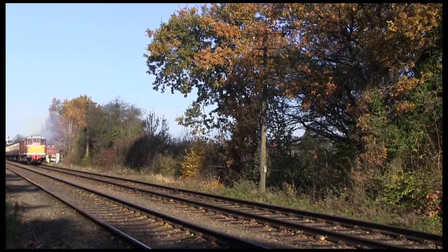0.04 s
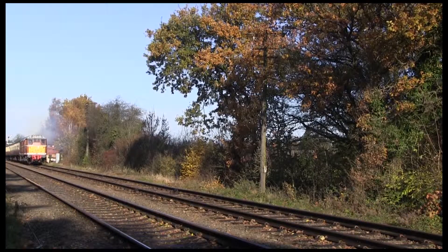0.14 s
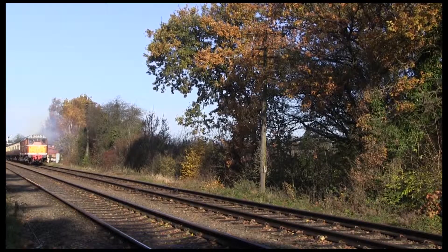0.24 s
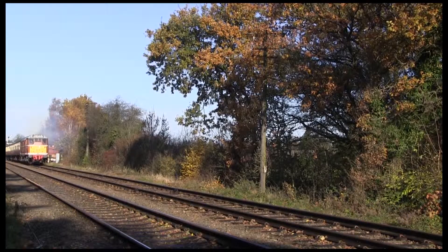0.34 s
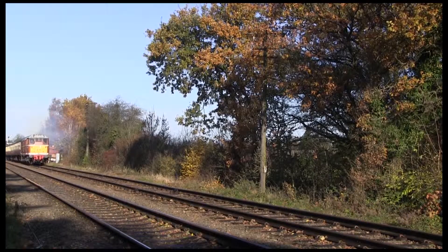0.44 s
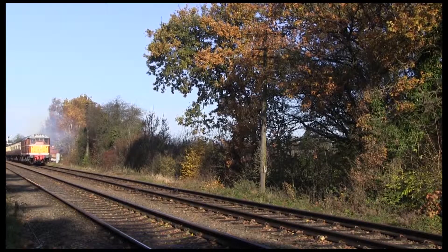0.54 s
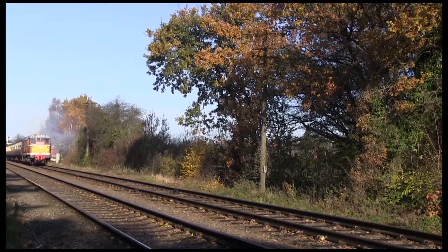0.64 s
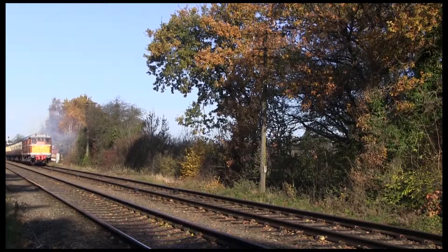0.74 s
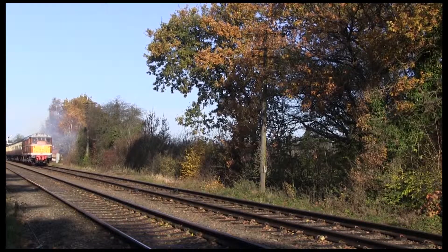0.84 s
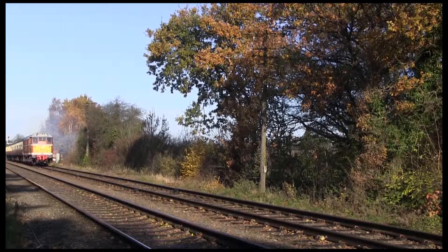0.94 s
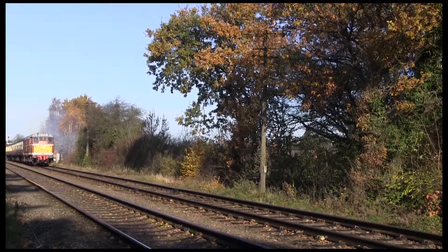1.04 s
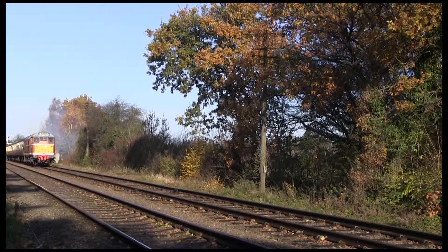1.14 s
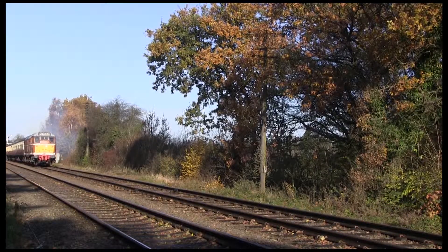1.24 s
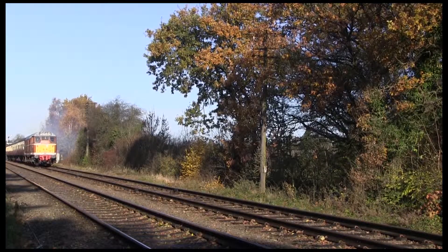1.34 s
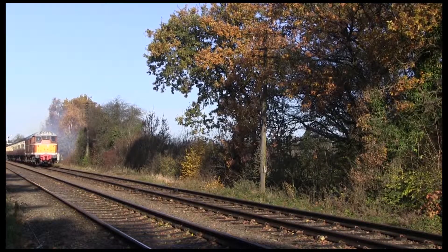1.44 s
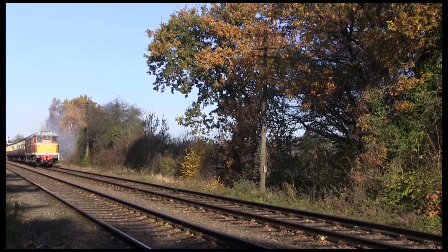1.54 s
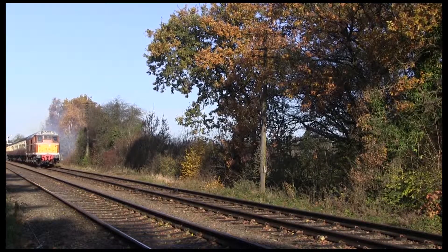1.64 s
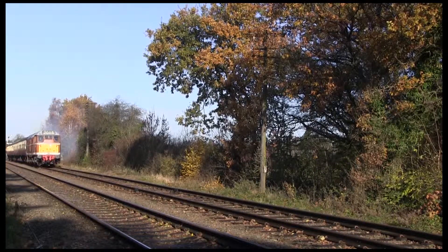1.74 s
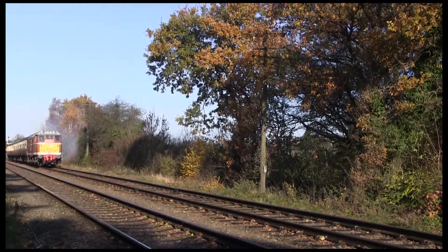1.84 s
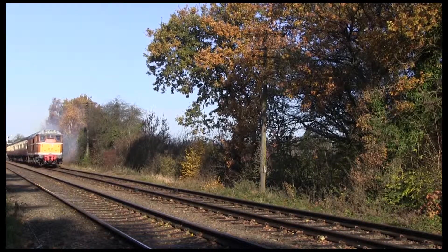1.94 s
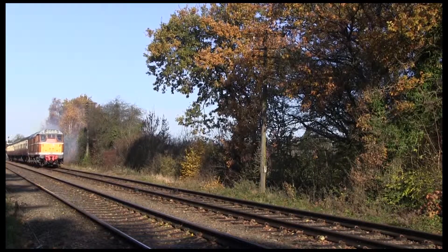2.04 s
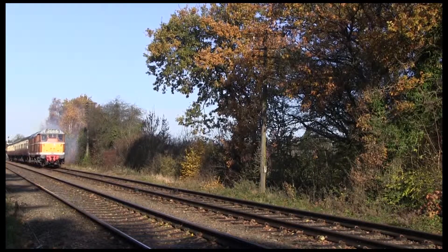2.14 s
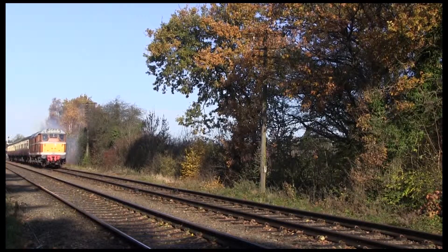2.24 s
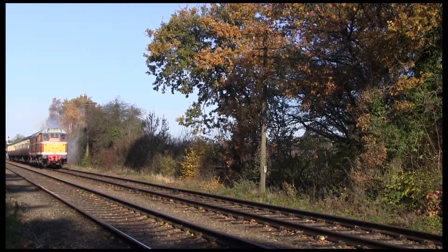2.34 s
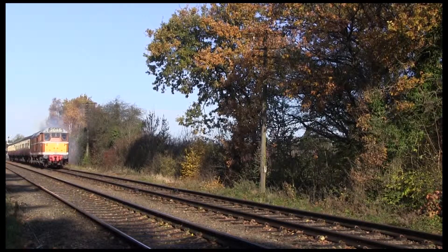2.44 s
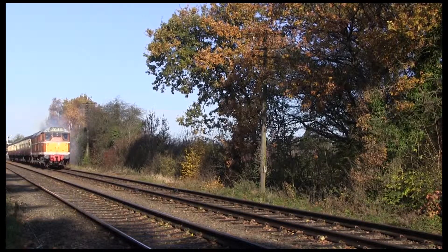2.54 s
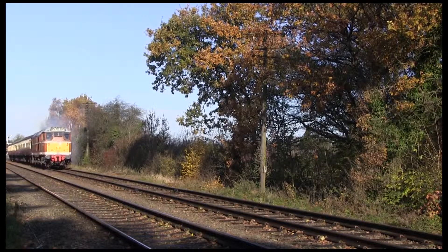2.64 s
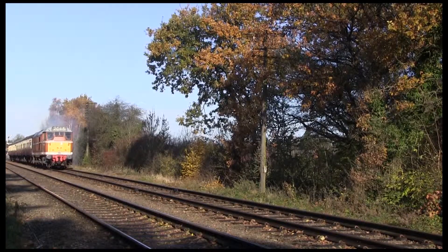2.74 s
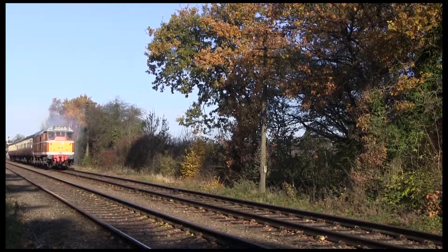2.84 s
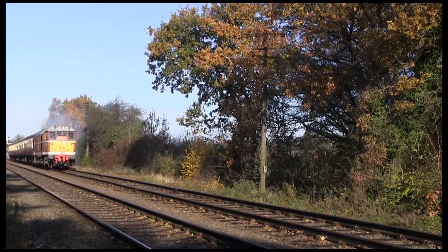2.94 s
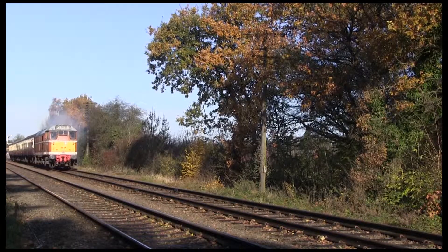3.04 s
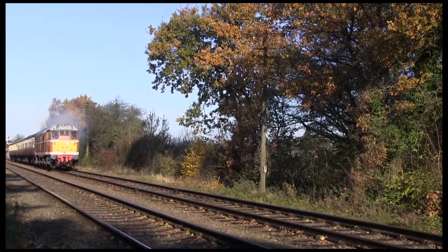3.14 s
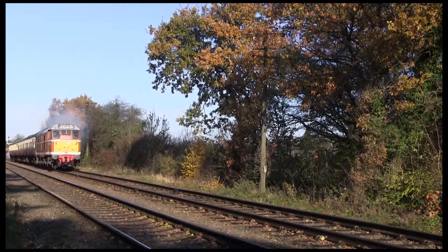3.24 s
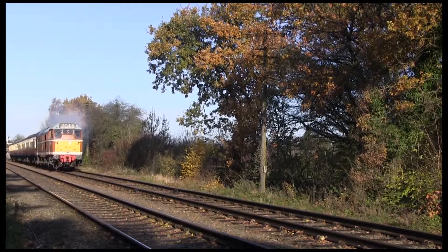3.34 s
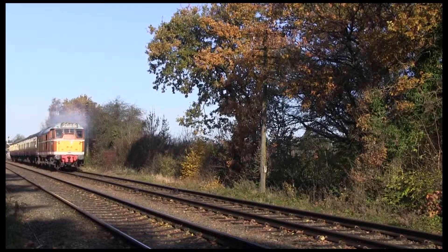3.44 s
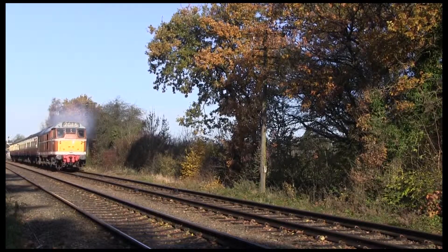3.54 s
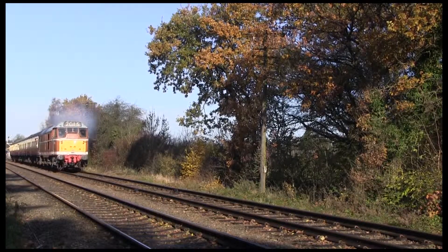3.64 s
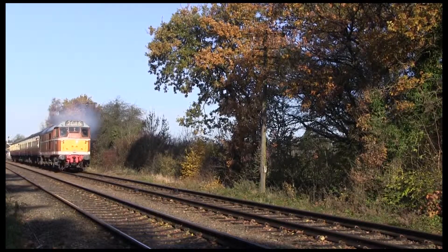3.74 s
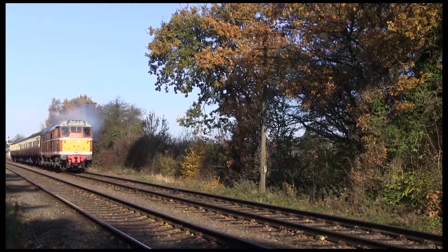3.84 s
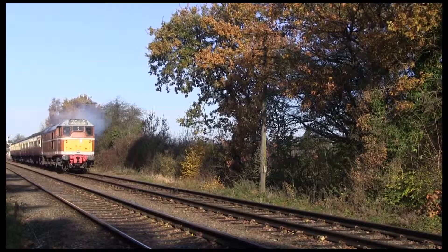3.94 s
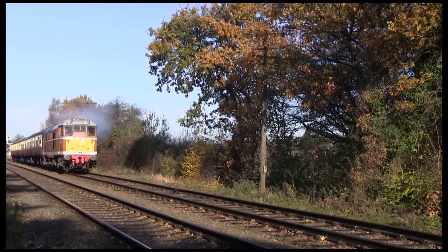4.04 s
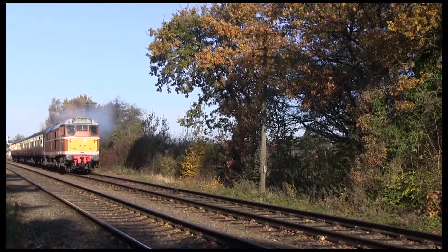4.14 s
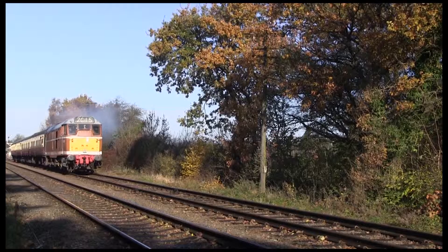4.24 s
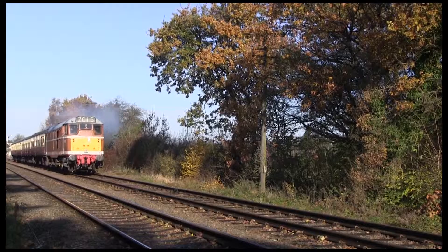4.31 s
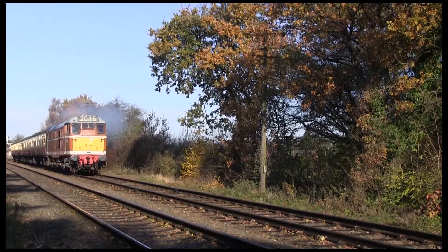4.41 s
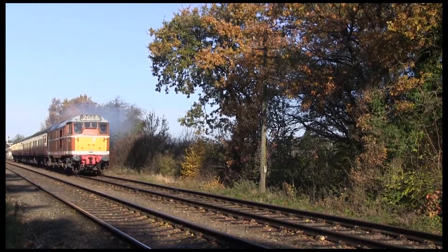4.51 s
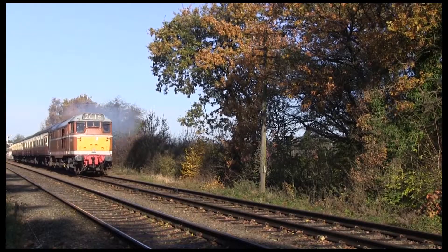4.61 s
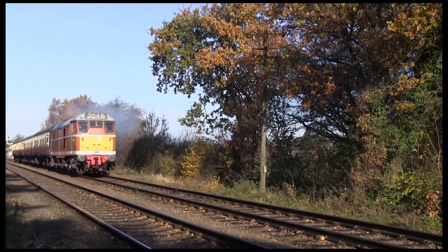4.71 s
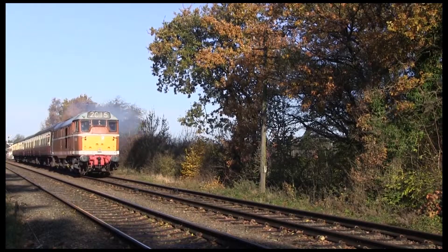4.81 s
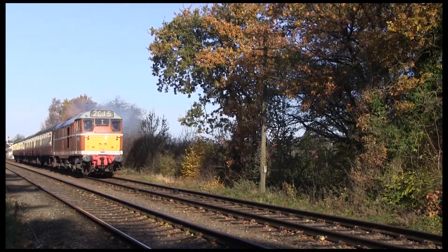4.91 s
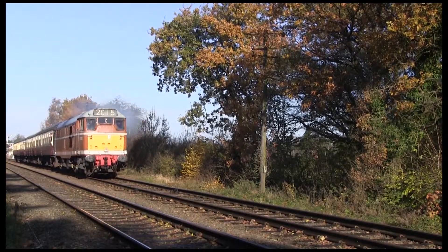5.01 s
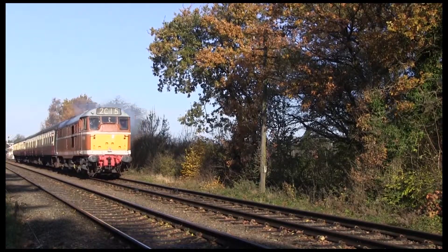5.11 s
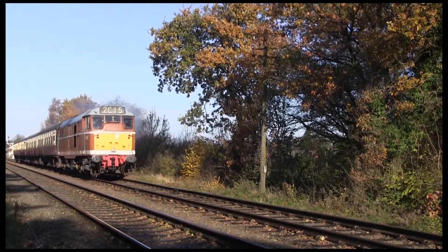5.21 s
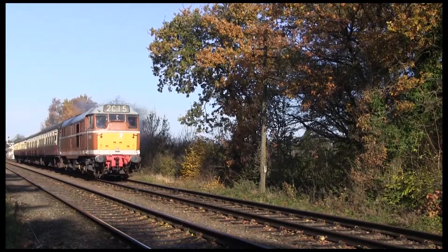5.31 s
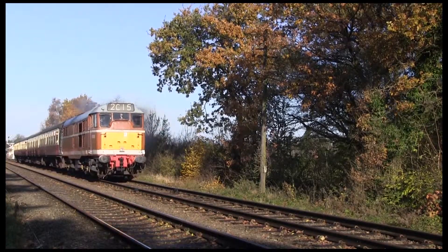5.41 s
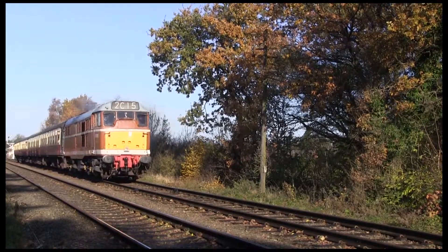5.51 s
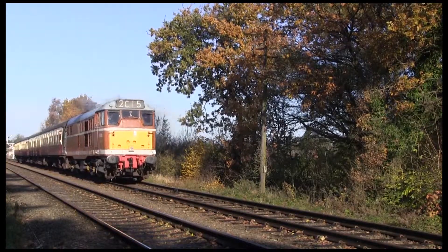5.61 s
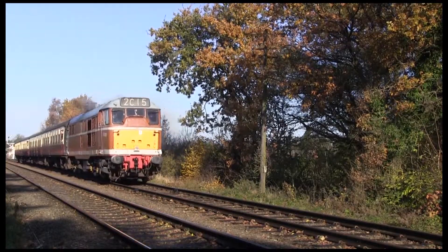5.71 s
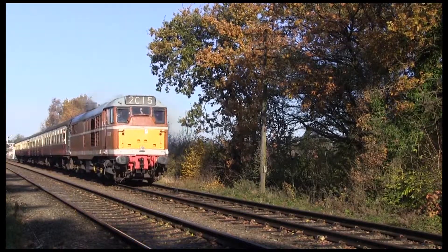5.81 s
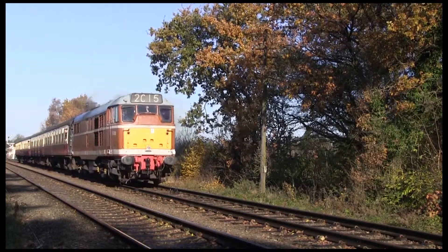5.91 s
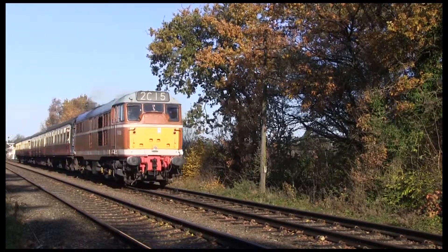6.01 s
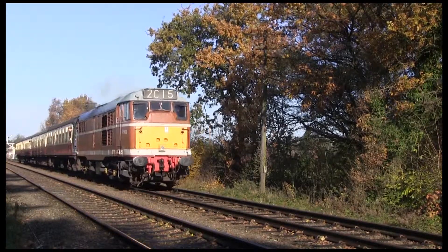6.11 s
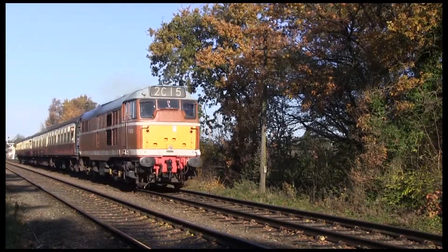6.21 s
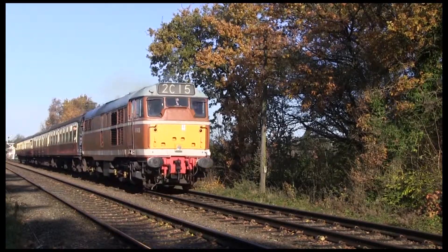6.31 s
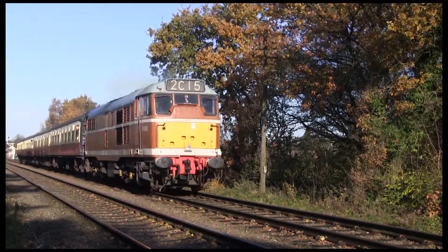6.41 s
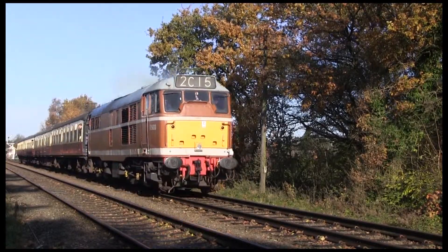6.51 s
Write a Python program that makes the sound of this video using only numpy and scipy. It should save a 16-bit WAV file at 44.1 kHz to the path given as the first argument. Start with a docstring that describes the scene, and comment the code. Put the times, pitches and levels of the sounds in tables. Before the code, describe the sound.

Outdoors beside a railway, a diesel locomotive draws steadily nearer. A deep, uneven engine throb and boom holds nearly constant pitch while rough exhaust growl, roar and hiss pulse rapidly above it. The gas noise surges midway with sharp spits, eases slightly, then becomes loud and harsh. Wheels rumble beneath. One fixed lineside microphone, sound in the right channel only, left nearly silent.

```python
"""Diesel locomotive closing in, from the lineside

A twelve-cylinder diesel under power draws a train towards a single microphone beside the track.
Uneven firings throb through the exhaust pipe and steep fronts knock on the stack; six gas blasts an engine
cycle shape noise into growl, roar, rasp and hiss, with gliding hollow colours, whistles and sharp spits.
Most layers grow by their own law with nearness; the gas surges midway over a rumble of wheels.
All levels stand ahead of the microphone's gain; the left channel holds only crosstalk and hiss."""
import sys
import numpy as np
from scipy import signal
from scipy.fft import rfft, irfft
from scipy.io import wavfile
from scipy.ndimage import uniform_filter1d

SR = 44100
rng = np.random.default_rng(int(sys.argv[2]) if len(sys.argv) > 2 else 0)


def waveform_to_disk(signal):
    """Save audio, clipped to [-1, 1], as 16-bit WAV at the path in sys.argv[1]."""
    frames = np.transpose(np.atleast_2d(signal))
    scaled = np.clip(frames, -1, 1) * 32767
    samples = np.round(scaled).astype(np.int16)
    wavfile.write(sys.argv[1], SR, samples)


N = 289296
TIME = np.arange(N) / SR  # s

# one engine cycle, a row per cylinder: (pulse arrival [firing intervals], pulse level [dB],
# steep front arrival [firing intervals], front level [dB])
CYLINDER_FIRINGS = [(0.05, 7, 0.095, -3), (0.73, -2.5, 0.82, -23), (2.11, 4.5, 2.24, -5.5),
                    (3.86, 3, 3.1, -12), (4.19, 5, 5.2, -4), (5.35, 3, 5.36, -1.5), (6.0, 7.5, 6.08, 0.5),
                    (7.48, 5, 7.56, 0.5), (8.02, 1, 9.9, -3.5), (9.19, 5, 3.9, -32),
                    (10.17, -3.5, 10.15, -11.5), (11.01, 1.5, 11.02, -6)]


def undb(db):
    """Decibels to gain."""
    return 10 ** (np.asarray(db) / 20)


def unit(x):
    """Scale to rms 1."""
    return x / np.sqrt(np.mean(x ** 2))


def even(x, size=512):
    """Hold a noise at rms 1 from moment to moment, so that every blast carries a like charge."""
    return x / np.sqrt(uniform_filter1d(x ** 2, size))


def curves(table):
    """Each column of a table as a line through time."""
    s, *columns = np.transpose(table)
    return [np.interp(TIME, s, column) for column in columns]


def band(x, low_hz, high_hz, order=4):
    """Band-pass without delay."""
    f = np.arange(N // 2 + 1) * SR / N + 1e-3  # never zero
    low_side = 1 + (low_hz / f) ** (2 * order)
    high_side = 1 + (f / high_hz) ** (2 * order)
    return irfft(rfft(x) / low_side / high_side, N)


def colour(x, points, size=16384):
    """Causal minimum-phase filter through (Hz, dB) points, by folding the cepstrum."""
    hz, db = np.transpose(points)
    f = np.arange(size // 2 + 1) * SR / size + 1
    gain = undb(np.interp(np.log(f), np.log(hz), db))
    cepstrum = irfft(np.log(gain))
    cepstrum[1:size // 2] *= 2
    cepstrum[size // 2 + 1:] = 0
    response = irfft(np.exp(rfft(cepstrum)))
    return signal.fftconvolve(x, response)[:N]


def resonance(x, hz, width_hz):
    """One resonance, gain 1 at its centre."""
    return signal.lfilter(*signal.iirpeak(hz, hz / width_hz, fs=SR), x)


def ring(x, notes, gain=1):
    """Add the ringing of a set of resonances to a sound."""
    return x + gain * sum(undb(db) * resonance(x, hz, width_hz) for hz, width_hz, db in notes)


def lift(x, part, db):
    """Raise or lower one part of a sound by a level curve."""
    return x + part * (undb(db) - 1)


def noise():
    """White noise."""
    return rng.standard_normal(N)


def walk(rate):
    """Smooth random wandering with rms 1, given a new target rate times a second."""
    k = int(SR / rate)
    steps = np.repeat(rng.standard_normal(N // k + 1), k)
    return unit(uniform_filter1d(steps, k)[:N])


def narrow(hz, width_hz):
    """A tone smeared by turbulence into noise reaching about width_hz each side of a pitch; rms 1."""
    smear = unit(band(noise(), 0.97, width_hz, order=1))
    return unit(smear * np.sin(2 * np.pi * np.cumsum(hz) / SR))


def cycle_noise(crank, repeat, size=6000):
    """Noise whose power repeats in part with every engine cycle: each cylinder has its own voice."""
    place = (crank / len(CYLINDER_FIRINGS) % 1 * size).astype(int)
    repeating = rng.standard_normal(size)[place]
    return np.sqrt(repeat) * repeating + np.sqrt(1 - repeat) * noise()


def distance():
    """Metres from locomotive to microphone, along a straight track at steady speed."""
    train_m_s, passes_s, track_m = 11.234, 8.98, 8.7  # speed, time of drawing level, microphone to track
    return np.hypot(train_m_s * (passes_s - TIME), track_m)


def approach(near_db, fall_db):
    """A level that is near_db at 30 m and drops by fall_db with each doubling of distance."""
    near_m = 30
    return near_db - fall_db * np.log2(distance() / near_m)


def closeness():
    """0 while the locomotive is far off, nearing 1 once it is close."""
    middle_m, span_m = 41, 3.1
    return 1 / (1 + np.exp((distance() - middle_m) / span_m))


def through_air(x, patchy_db, count=8):
    """Moving air makes each half octave swell and fade on its own."""
    out = x
    far = 1 - 0.4 * TIME / TIME[-1]  # a shorter path wavers less
    for hz in 450 * np.sqrt(2) ** np.arange(count):
        half_octave = band(x, hz, hz * np.sqrt(2), order=8)
        out = lift(out, half_octave, patchy_db * far * walk(6))
    return out


def firings(crank, slot, db, scatter_db):
    """One pressure pulse per cylinder, in the same lopsided pattern every engine cycle."""
    starts = len(slot) * np.arange(-1, crank[-1] / len(slot))
    due = (starts[:, None] + slot).ravel()
    at = np.interp(due, crank, np.arange(N), left=-1, right=-1).astype(int)
    size = undb(np.tile(db, len(starts)) + scatter_db * rng.standard_normal(len(at)))
    return np.bincount(at[at >= 0], size[at >= 0], N)


def exhaust(crank):
    """Firings ring the pipe: thud, boom and drone carry far and grow slowly; throb and overtone are thinner."""
    # exhaust pipe response: (frequency [Hz], gain [dB]); each band is levelled afresh below
    pipe_response = [(28.0, -49.0), (38.0, -68.8), (46.0, -18.4), (58.0, -29.6), (70.0, 0.0), (92.0, -9.6),
                     (125.0, -14.2), (150.0, -20.3), (180.0, -29.9), (210.0, -20)]
    # the thin overtone as it reaches the microphone: (time [s], level [dB])
    overtone_level = [(0, -58), (1.5, -55), (3, -52), (4, -44.5), (5.2, -41), (6.56, -36.5)]
    slot, db, _, _ = np.transpose(CYLINDER_FIRINGS)
    pipe = -colour(firings(crank, slot, db, scatter_db=0.5), pipe_response)
    boom_loss_db = 4.5 * closeness()  # close up the boom stops growing
    thud_db = approach(near_db=-32.0, fall_db=7.5)
    boom_db = approach(near_db=-29.5, fall_db=6.0) - boom_loss_db
    drone_db = approach(near_db=-30.5, fall_db=6.5) - 0.7 * boom_loss_db
    throb_db = approach(near_db=-42.5, fall_db=13.5)
    overtone_db = curves(overtone_level)[0] + walk(5)
    thud = unit(band(pipe, 27, 76.5, order=10)) * undb(thud_db)
    boom = unit(band(pipe, 78.4, 106.7, order=10)) * undb(boom_db)
    drone = unit(band(pipe, 103.6, 154, order=8)) * undb(drone_db)
    throb = unit(band(pipe, 158, 174, order=12)) * undb(throb_db)
    overtone = unit(band(pipe, 209, 213.8, order=20)) * undb(overtone_db)
    return thud + boom + drone + throb + overtone


def bark(crank):
    """Steep pressure fronts knock on the stack, and the casing rattles almost alike every cycle."""
    # notes of the casing that the knocks excite: (frequency [Hz], width [Hz], gain [dB])
    casing_notes = [(207, 17, -4.5), (259.4, 6.6, -7.5)]
    _, _, slot, db = np.transpose(CYLINDER_FIRINGS)
    knock = -resonance(firings(crank, slot, db, scatter_db=0.5), hz=243, width_hz=146)
    knock = band(band(knock, 1, 230, order=1), 206, 1500)
    knock = unit(ring(knock, casing_notes))
    rattle = unit(band(cycle_noise(crank, repeat=0.89), 224, 376)) * undb(-7.5)
    return (knock + rattle) * undb(approach(near_db=-32.5, fall_db=15.5))


def blasts(crank, depth_db, start, scatter_db, pattern=None):
    """Gas flow that jumps and dies away once for every two firings; rms held near 1."""
    # extra strength of the six blasts of an engine cycle, in order: level [dB]
    usual_pattern = [-0.88, -0.8, -1.9, -1.2, -0.97, -1.7]
    pattern = usual_pattern if pattern is None else pattern
    limp = 0.1  # blasts come alternately early and late by this many firing intervals
    rise, sharpness = 0.25, 1.5  # crest as a share of the period; a lower exponent is broader
    limping = crank + limp * np.cos(np.pi * (crank - .5) / 2)
    count, age = np.divmod((limping - start) / 2 + len(pattern), 1)  # age in blast periods
    count = count.astype(int)
    shape = (age / rise * np.exp(1 - age / rise)) ** sharpness
    own_db = np.take(pattern, count, mode="wrap") + scatter_db * rng.standard_normal(N // 100)[count]
    flow = undb((depth_db + own_db) * shape)
    return flow / np.sqrt(uniform_filter1d(flow ** 2, SR // 4))


def flares(hz):
    """Decibels that brief flares and lulls add to the gas noise around one pitch."""
    # flares and lulls: (middle [s], length [s], gain [dB], centre [Hz])
    flare_list = [(1.366, 0.22, 3.5, 4500), (1.3, 0.55, 2, 1000), (2.038, 0.58, 2.5, 3700),
                  (2.277, 0.046, 3, 4000), (2.42, 0.26, -5, 10100), (2.745, 0.28, 3.5, 3200),
                  (3.05, 0.56, 2, 1100), (3.206, 0.13, -5, 6900), (3.344, 0.18, 2.5, 4000),
                  (3.445, 0.26, 3.5, 7950), (3.495, 0.24, -0.5, 800), (3.776, 0.16, 2.5, 1330),
                  (4.737, 0.68, -1.2, 3500), (4.7, 0.16, -1, 800), (5.604, 0.44, 1.5, 636),
                  (5.83, 0.3, 1.5, 2820), (6.145, 0.27, 3, 10000), (6.328, 0.92, 4, 2500),
                  (6.42, 0.17, 5, 1390), (1.214, 0.083, 2, 3000), (2.7, 0.66, 1.5, 650),
                  (4.2, 0.64, 0.9, 1600), (6.3, 1, -1, 520)]
    reach_octaves = 1  # to each side of the centre
    total_db = 0
    for s, length, db, centre in flare_list:
        in_time = (2 * (TIME - s) / length) ** 2
        in_pitch = (np.log2(hz / centre) / reach_octaves) ** 2
        total_db = total_db + db * np.exp(-in_time - in_pitch)
    return total_db


def hollows():
    """Narrow hollow colours swell, waver as they glide upwards through the distant roar, and fade."""
    # hollow colours: (start [s], length [s], first pitch [Hz], last pitch [Hz], level [dB])
    glides = [(0, 0.84, 932, 943, -58.5), (0, 0.98, 1260, 1405, -63), (0.849, 0.77, 580, 923, -55),
              (1.752, 0.86, 878, 940, -55.5), (2.551, .8, 719.5, 1301, -45), (3.645, 0.59, 939, 964, -51)]
    waver = 0.012  # share by which the pitch wanders
    out = np.zeros(N)
    for s, length, first_hz, last_hz, db in glides:
        along = np.clip((TIME - s) / length, 0, 1)
        hz = (first_hz + (last_hz - first_hz) * along) * (1 + waver * walk(7))
        out += undb(db) * np.sin(np.pi * along) * even(narrow(hz, width_hz=100))
    return out


def gas(crank, surge_db):
    """Turbulent blasts at the stack, from a low growl to a thin hiss; the higher parts come a little later."""
    # colour of the gas noise: (frequency [Hz], gain [dB])
    gas_colour = [(180, -74.5), (300, 17.5), (384, 1.5), (543, -1), (720, -5), (808, -9), (1140, -12.5),
                  (1300, -6.5), (1940, -13), (3070, -12.5), (4070, -15), (6460, -26), (8990, -30.5),
                  (10400, -34), (15500, -53)]
    # notes of the stack that the gas excites: (frequency [Hz], width [Hz], gain [dB])
    stack_notes = [(550, 56, -3), (723, 44, -9.5), (964, 66, -9)]
    # pulsing from trough to crest, of which each part takes its own share: (time [s], depth [dB])
    chuff = [(0, 5), (1.7, 5), (2.9, 11.7), (3.3, 11.5), (3.8, 10), (4.5, 8.3), (5.05, 5.5), (5.85, 11),
             (6.56, 12)]
    # extra strength of the six blasts in the growl, in order: level [dB]
    growl_pattern = [4.5, 2.5, 4.5, 2.5, 1, 4]
    growl_db = approach(near_db=-31.0, fall_db=14.5) + 0.81 * surge_db + flares(hz=557)
    roar_db = approach(near_db=-34.5, fall_db=13.5) + 1.44 * surge_db + flares(hz=1130)
    rasp_db = approach(near_db=-33.5, fall_db=12.5) + 0.54 * surge_db + flares(hz=3240)
    hiss_db = approach(near_db=-47.5, fall_db=14.0) + 0.88 * surge_db + flares(hz=6800)
    depth_db, = curves(chuff)

    low_jet = colour(cycle_noise(crank, repeat=0.25), gas_colour)
    low_jet = through_air(low_jet, patchy_db=2.0, count=4)
    stack_mask_db = 9 * closeness()  # close up the broad roar drowns the stack's notes
    low_jet = ring(low_jet, stack_notes, gain=undb(-stack_mask_db))
    jet = colour(cycle_noise(crank, repeat=0.082), gas_colour)
    jet = through_air(jet, patchy_db=1.85)
    top_db = approach(near_db=9.0, fall_db=9.0) + 0.4 * flares(hz=12000)  # air swallows the top from afar
    jet = lift(jet, band(jet, 10700, SR), top_db)

    # the growl is a soft push under each blast
    growl_flow = blasts(crank, 0.26 * depth_db, start=-0.03, scatter_db=2.2, pattern=growl_pattern)
    roar_flow = blasts(crank, 0.99 * depth_db, start=0.03, scatter_db=2.1)
    rasp_flow = blasts(crank, 0.74 * depth_db, start=0.036, scatter_db=1.74)
    hiss_flow = blasts(crank, 0.66 * depth_db, start=0.12, scatter_db=2.0)
    growl = even(band(low_jet, 391.0, 1065, order=5), size=1024) * growl_flow * undb(growl_db)
    roar = even(band(low_jet, 850, 1227, order=3)) * roar_flow * undb(roar_db)
    rasp = even(band(jet, 1300, 5150, order=5)) * rasp_flow * undb(rasp_db)
    hiss = unit(band(jet, 5560, 16800, order=6)) * hiss_flow * undb(hiss_db)
    hollow = hollows() * blasts(crank, depth_db=12, start=0.05, scatter_db=0.3)
    return growl + roar + rasp + hiss + hollow


def turbocharger(crank, surge_db):
    """A close pair of whistles leaves through the stack and so surges and throbs with the gas."""
    # the upper whistle climbs as the turbocharger spins up: (time [s], blade tone [Hz])
    blade_tone = [(0, 9880), (1.5, 9930), (2.7, 10060), (4.3, 10400), (6, 10720), (6.56, 10800)]
    hz, = curves(blade_tone)
    partner = 0.942  # pitch ratio of the second whistle
    pair = narrow(hz, width_hz=230) + narrow(partner * hz, width_hz=230)
    tone = pair * undb(approach(near_db=-52.5, fall_db=18.5) + 0.97 * surge_db)
    flow = blasts(crank, depth_db=7.0, start=0.18, scatter_db=1.5)
    return band(tone, 7000, 11300, order=8) * flow


def wheels():
    """Broad noise of wheels on rail, wavering and swelling as the train closes in."""
    rumble = unit(band(noise(), 94, 265, order=3)) * undb(-5.0 + 0.51 * walk(3.34))
    ground = unit(band(noise(), 50, 165)) * undb(-7)
    return (rumble + ground) * undb(approach(near_db=-31.5, fall_db=10))


def spits():
    """Single sharp spits of the exhaust: bursts of band noise with a tail scattered by lineside trees."""
    # spits: (time [s], level [dB], centre [Hz])
    spit_list = [(1.919, -45, 2800), (1.94, -48, 3000), (2.111, -42, 2700), (2.131, -38.5, 3040),
                 (2.137, -41, 2900), (2.153, -44, 3570), (2.178, -46, 3000), (2.197, -53, 5200),
                 (2.262, -42, 2000), (2.282, -50, 3400), (2.674, -40.5, 1500), (2.736, -35, 950),
                 (2.845, -38, 1230), (2.909, -40, 1300), (2.977, -45, 1240), (3.086, -46, 6300),
                 (3.106, -45, 6200), (3.149, -36, 1400), (3.171, -39, 1500), (3.191, -35.5, 1300),
                 (3.238, -39, 1100), (3.258, -35, 1210), (3.368, -48, 6500), (3.389, -51, 7200),
                 (3.41, -41, 1600), (3.433, -53, 7100), (3.477, -48, 7100), (3.497, -48, 7100),
                 (3.712, -39, 1400), (3.735, -36, 1550), (3.778, -37, 1400), (3.823, -37, 1200),
                 (3.867, -42, 1000), (4.471, -34, 1200), (5.534, -41, 1600), (5.748, -34, 1800),
                 (5.86, -32, 2170), (5.881, -32.5, 2530), (6.249, -23, 1730), (6.357, -29, 1790),
                 (6.377, -27, 1710), (6.508, -24, 1880)]
    rise_s, tail_db, tail_s = 0.0028, -14, 0.022  # time to crest, tail level and decay time
    out, size = np.zeros(N + SR), SR // 5
    age = np.arange(size) / SR
    rise = age / rise_s
    crack = rise * np.exp(1 - rise)
    tail = undb(tail_db) * np.tanh(rise) * np.exp(-age / tail_s)
    shape = np.hypot(crack, tail)
    for s, db, hz in spit_list:
        edges = signal.butter(2, [0.65 * hz, 1.164 * hz], "bandpass", fs=SR, output="sos")
        burst = signal.sosfilt(edges, rng.standard_normal(2 * size))
        burst = even(burst, size=256)[size:]  # skip the filter's settling
        first = int(s * SR)
        out[first:first + size] += undb(db) * shape * burst
    return out[:N]


def scene():
    """Engine, turbocharger and wheels as they reach the microphone, alike on two channels."""
    # engine speed as heard: (time [s], rate [firings per second])
    engine_speed = [(0, 92.63), (0.5, 93.25), (3.9, 92.13), (5, 92.22), (6.56, 92.65)]
    # surge of the gas apart from distance, of which each part takes its own share: (time [s], level [dB])
    gas_surge = [(0, -2), (1.35, -2.5), (1.7, -2), (2.45, 0.3), (2.7, 1.5), (3.8, 2.5), (4.5, 1.7),
                 (5.3, -2.5), (6.3, -1.5), (6.56, -4)]
    crank = np.cumsum(curves(engine_speed)[0]) / SR  # counted in firings
    surge_db, = curves(gas_surge)
    engine = exhaust(crank) + bark(crank) + gas(crank, surge_db) + spits()
    train = engine + turbocharger(crank, surge_db) + wheels()
    return np.array([train, train])


def record(dry):
    """The microphone feeds only the right channel; the left holds crosstalk and hiss. The top is cut."""
    top_hz = 15500
    right = 2 * dry[1]
    low_crosstalk = undb(-44) * band(dry[0], 1, 150, order=1)
    high_crosstalk = undb(-54) * band(dry[0], 4000, 16000, order=1)
    left = low_crosstalk + high_crosstalk + undb(-78) * noise()
    top_cut = signal.ellip(10, .1, 80, top_hz, fs=SR, output="sos")
    return signal.sosfilt(top_cut, np.array([left, right]))


dry = scene()
out = record(dry)
waveform_to_disk(out)
```